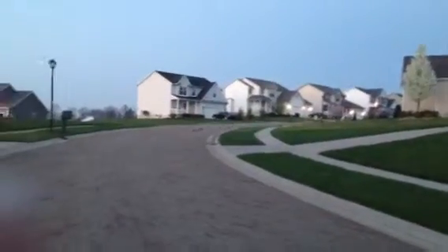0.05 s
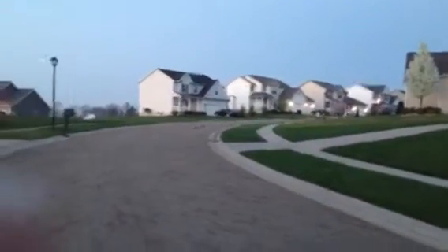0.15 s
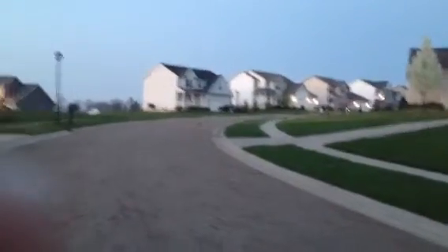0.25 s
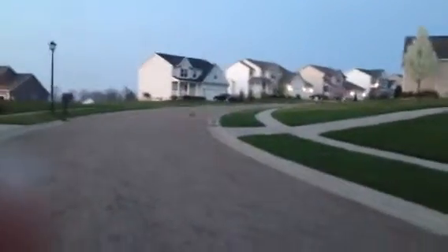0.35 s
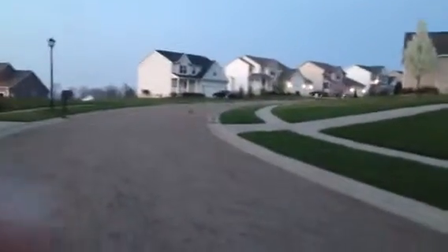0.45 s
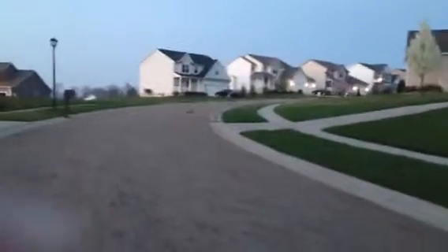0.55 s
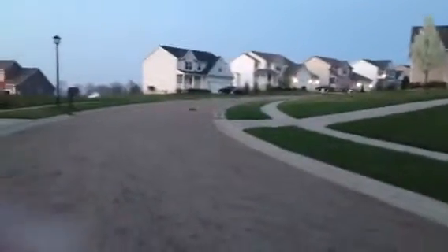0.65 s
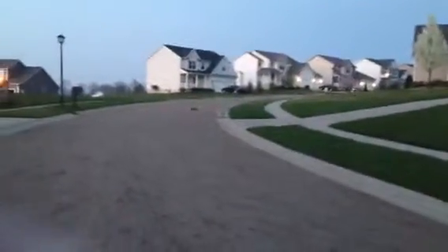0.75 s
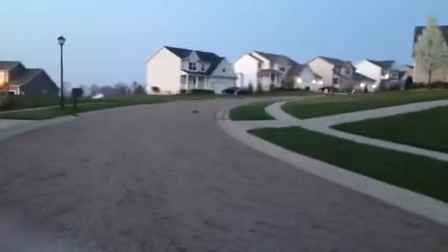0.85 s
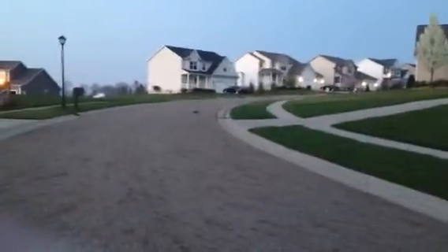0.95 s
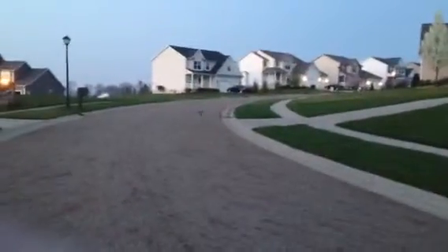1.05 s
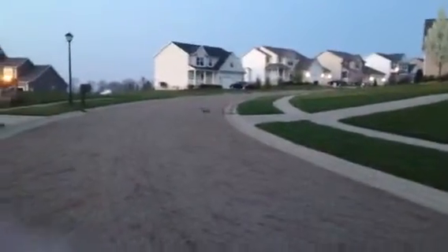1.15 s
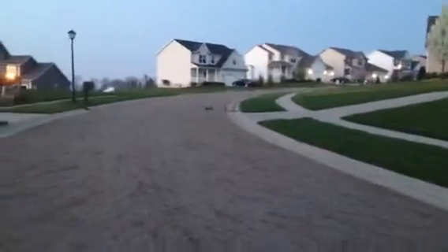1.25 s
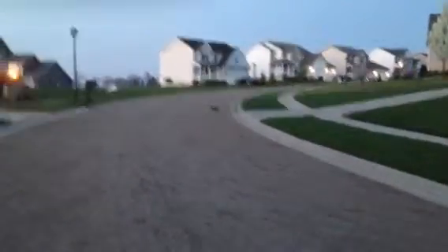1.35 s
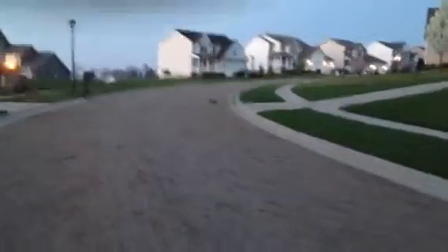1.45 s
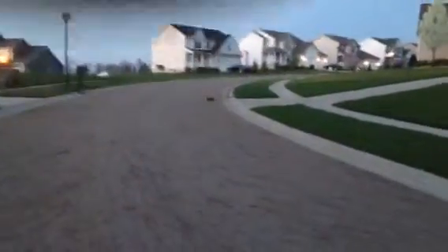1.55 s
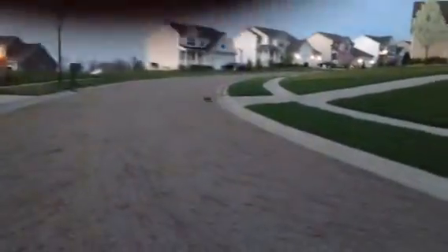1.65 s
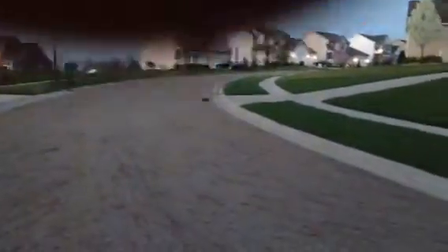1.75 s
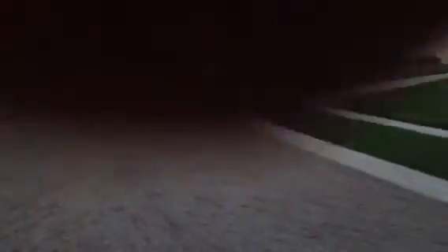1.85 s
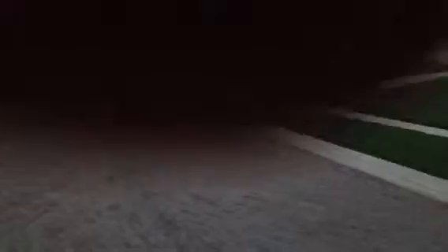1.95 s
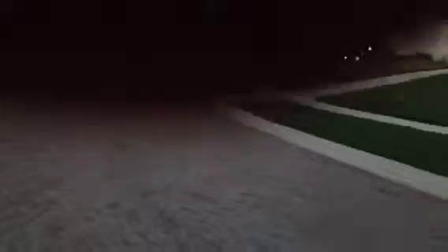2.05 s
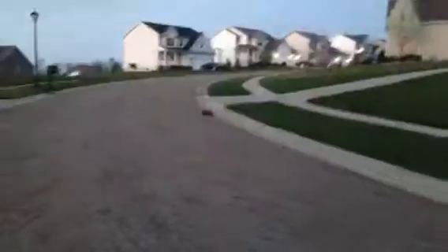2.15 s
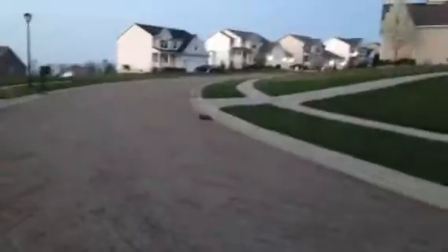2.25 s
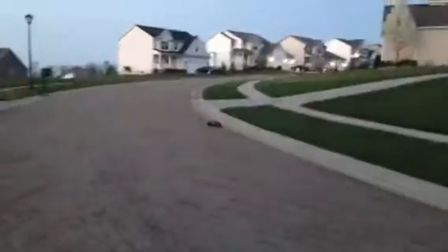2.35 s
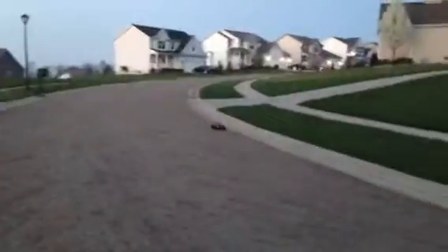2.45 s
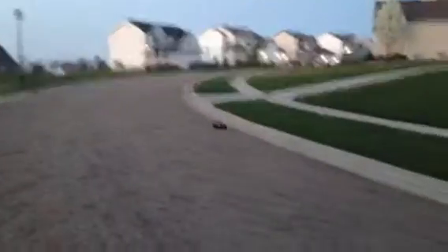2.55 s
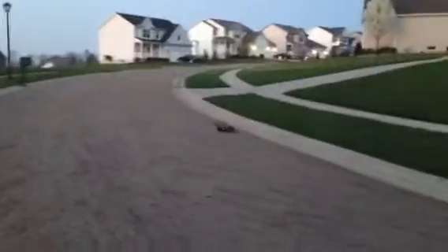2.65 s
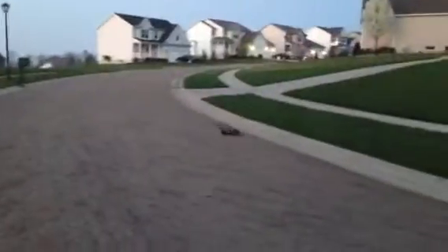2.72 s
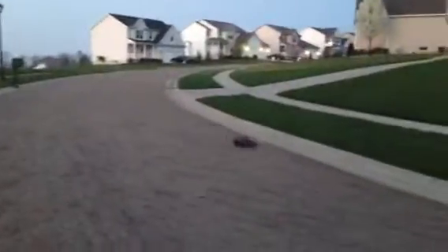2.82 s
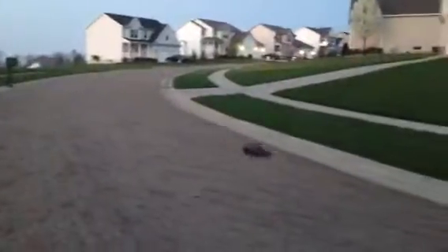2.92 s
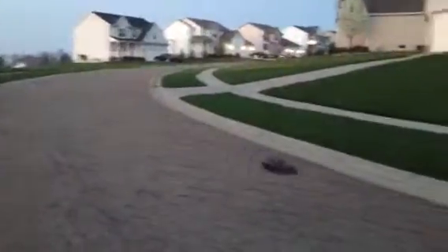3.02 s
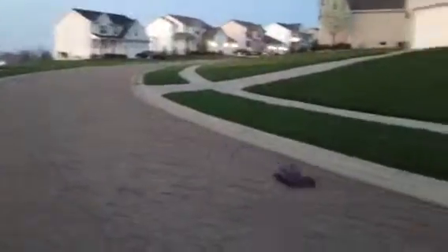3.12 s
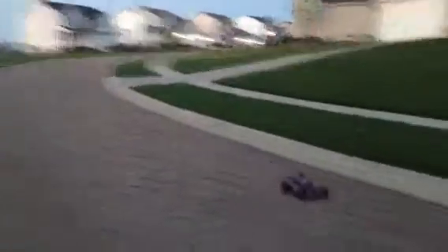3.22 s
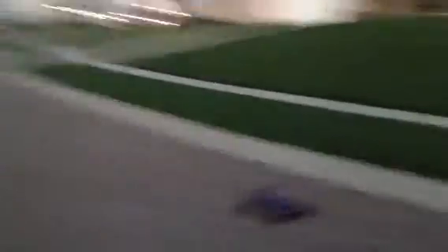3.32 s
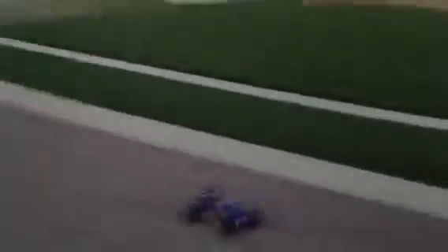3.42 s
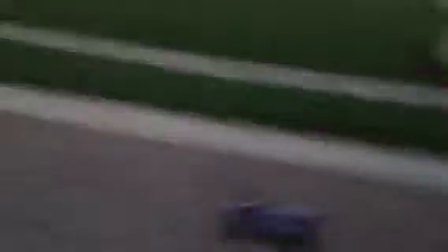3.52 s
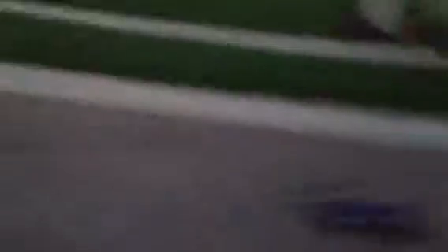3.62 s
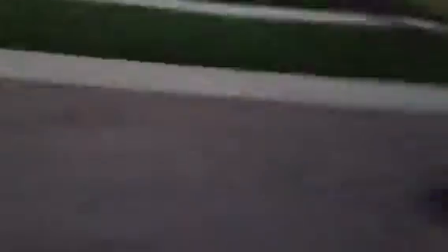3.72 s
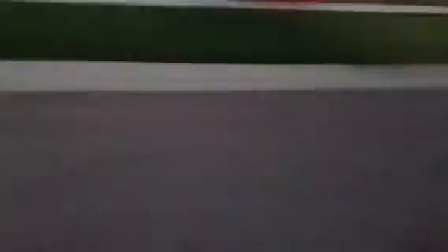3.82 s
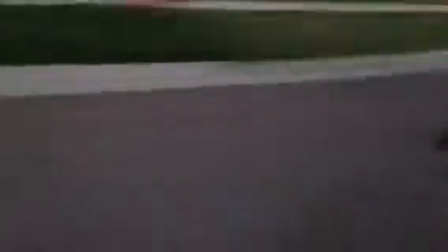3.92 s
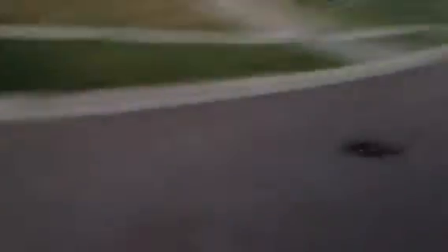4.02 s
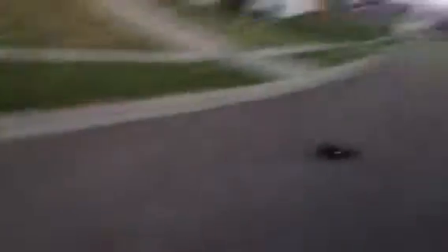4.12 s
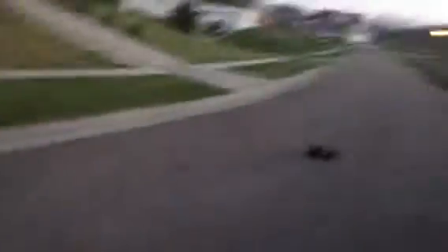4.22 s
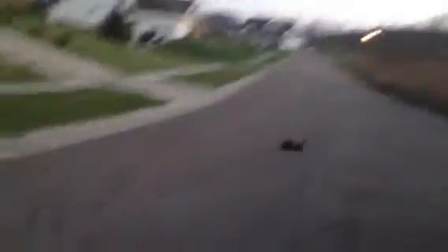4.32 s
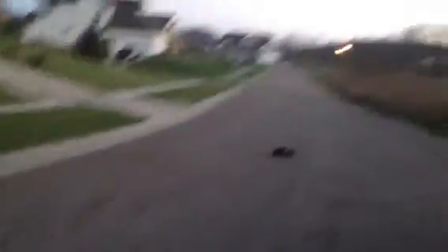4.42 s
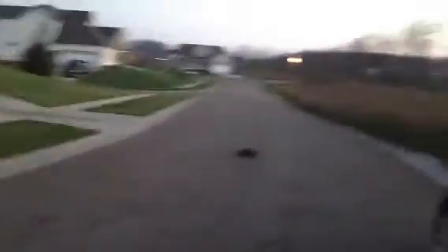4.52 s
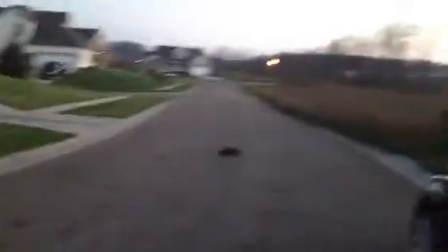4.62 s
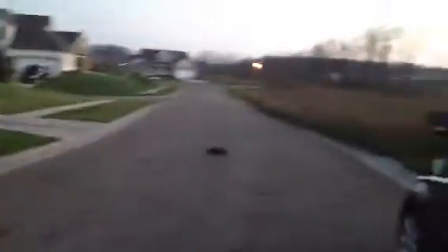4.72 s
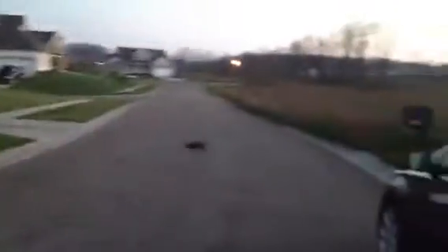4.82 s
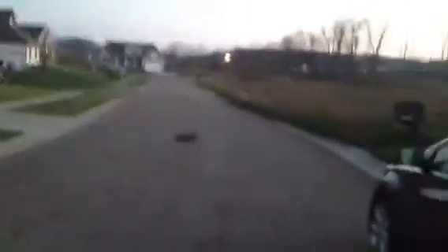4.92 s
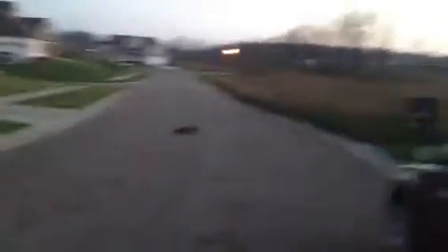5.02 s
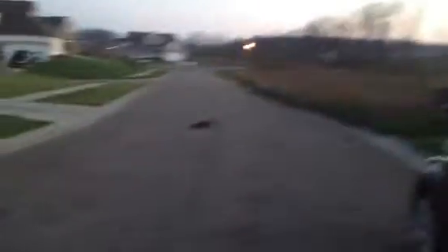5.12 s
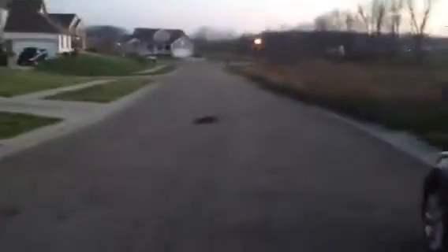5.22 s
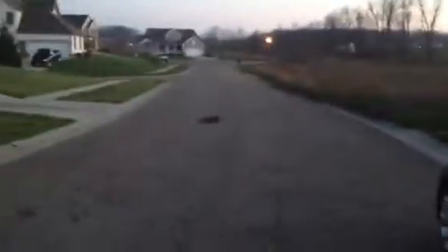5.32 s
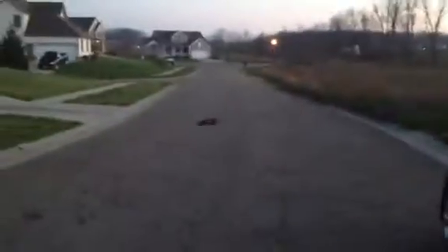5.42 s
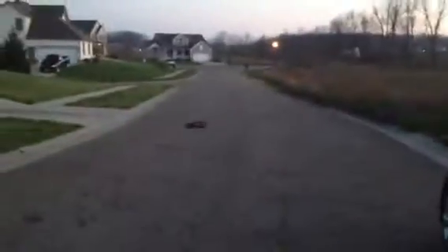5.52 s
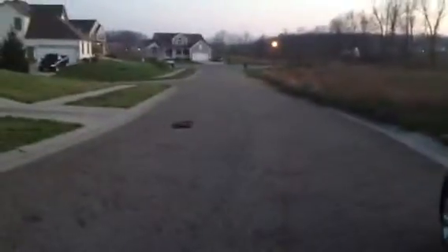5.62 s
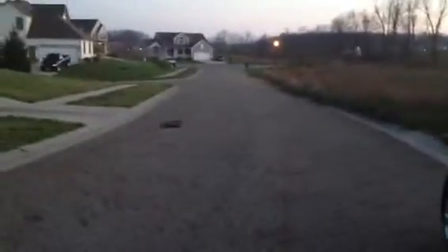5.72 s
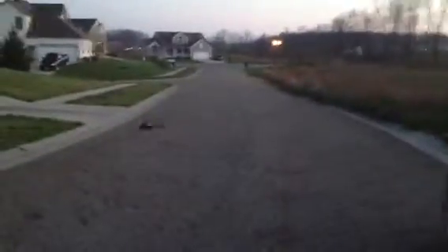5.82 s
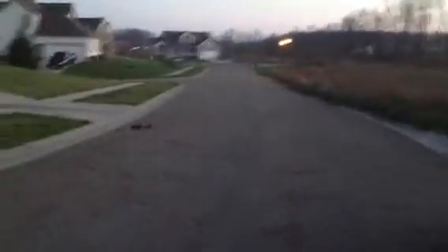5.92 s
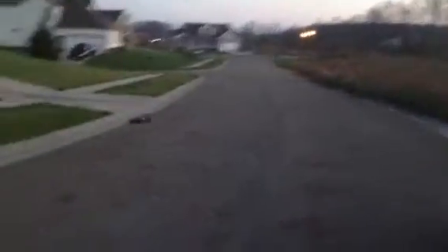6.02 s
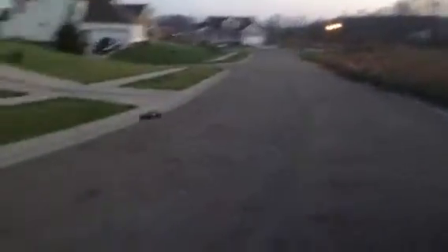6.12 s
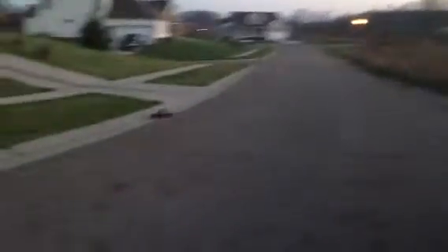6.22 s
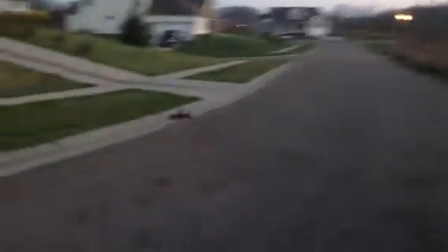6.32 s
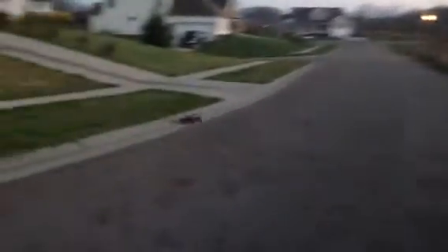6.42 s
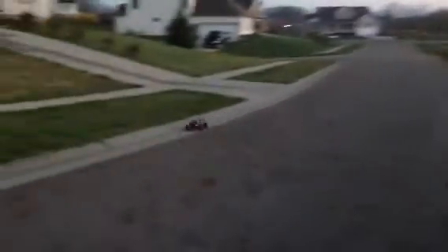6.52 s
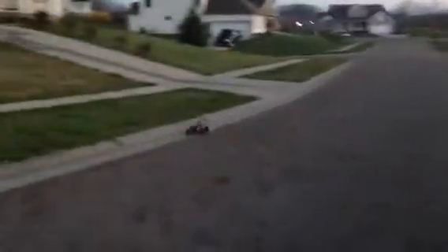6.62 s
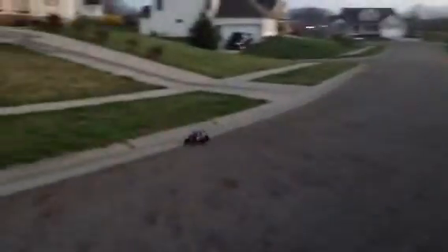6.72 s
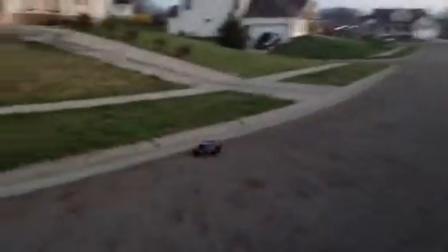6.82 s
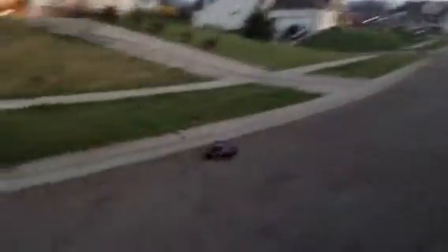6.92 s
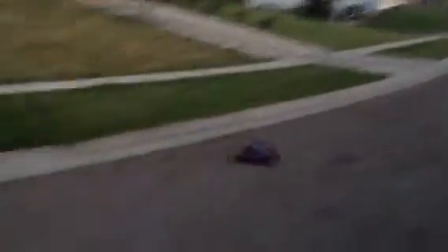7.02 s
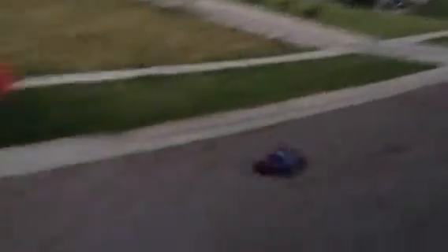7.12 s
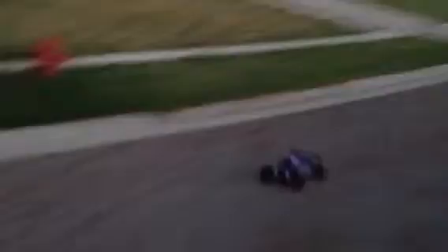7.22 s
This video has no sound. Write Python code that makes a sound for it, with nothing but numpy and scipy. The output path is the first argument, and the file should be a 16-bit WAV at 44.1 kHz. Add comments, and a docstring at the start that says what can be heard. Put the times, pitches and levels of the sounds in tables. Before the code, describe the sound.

A small electric radio-controlled truck whines past on asphalt, skids almost to a stop, then revs in bursts and speeds back.

```python
"""A small electric radio-controlled truck races up a quiet asphalt street: the road's grain drums on its
tyres, its treads hiss, its gearbox rattles with each wheel turn and its gear teeth whine. The sound and
its road reflection reach a hand-held microphone, first shaded by a finger, then briefly cupped.
The truck passes at 3.7 s, brakes into a squealing skid at 4.4 s and all but stops at 5.3 s. It turns with
chirping gears and scuffing tyres, then speeds back."""
import sys
import numpy as np
from scipy import signal
from scipy.fft import rfft, irfft
from scipy.io import wavfile
from scipy.ndimage import uniform_filter1d, map_coordinates

SR = 44100
rng = np.random.default_rng(int(sys.argv[2]) if len(sys.argv) > 2 else 0)


def dump_mix(stems):
    """Bounce the given channels to the path in sys.argv[1] as a 16-bit WAV at rate SR."""
    frames = np.atleast_2d(stems).T  # one column per channel
    limited = np.clip(frames, -1, 1)  # hard clip at full scale
    pcm = np.round(limited * 32767).astype(np.int16)
    wavfile.write(sys.argv[1], SR, pcm)


N = 320166
TIME = np.arange(N) / SR
BRAKE_S, STOP_S = 4.42, 5.27
# the truck's range from the microphone: time_s, distance_m
DISTANCE = [(0, 48), (1.25, 29.5), (2.3, 17.8), (2.6, 12.8), (3.05, 7.6), (3.35, 3.94), (3.55, 2.73),
            (3.72, 2.68), (4.1, 4.67), (4.4, 6.27), (4.7, 8.15), (5.25, 13), (6.0, 15.4), (6.4, 15.4),
            (6.75, 11.3), (7.0, 6.94), (7.26, 3.6)]


def gain_of(db):
    """Amplitude ratio of a level in decibels."""
    return 10 ** (np.asarray(db) / 20)


def unit_rms(x):
    """Normalisation to rms 1."""
    return x / np.sqrt(np.mean(abs(x) ** 2) + 1e-20)


def follow(rows):
    """Linear interpolation of each column over the times in the first."""
    times, *columns = np.transpose(rows)
    return [np.interp(TIME, times, column) for column in columns]


def until(end_s, ramp_s):
    """Envelope that is 1 until end_s, then falls linearly to 0."""
    return np.clip(1 - (TIME - end_s) / ramp_s, 0, 1)


def held(start_s, end_s, ramp_s):
    """Trapezoidal envelope: rises from start_s, falls from end_s."""
    return np.clip((TIME - start_s) / ramp_s, 0, 1) * until(end_s, ramp_s)


def swell(centre_s, half_s):
    """Gaussian envelope with peak 1."""
    return np.exp(-((TIME - centre_s) / half_s) ** 2)


def wander(rate_hz):
    """Random modulation: noise low-passed near rate_hz; rms 1."""
    f = np.arange(0, 3000, SR / N)
    real, imaginary = rng.standard_normal((2, len(f)))
    return unit_rms(irfft((real + 1j * imaginary) / (1 + (f / rate_hz) ** 4), N))


def narrowband(hz, width_hz):
    """Narrow-band noise: a carrier drifting in amplitude and phase; rms 1."""
    carrier = np.exp(2j * np.pi * np.cumsum(hz * np.ones(N)) / SR)
    return unit_rms((carrier * (wander(width_hz) + 1j * wander(width_hz))).real)


def grains(clump_db, clump_hz):
    """Countless tiny impacts sum to Gaussian noise, modulated as they clump."""
    return rng.standard_normal(N) * gain_of(clump_db * wander(clump_hz))


def coloured(x, spectrum):
    """Spectral shaping by rows of frequency_hz, level_db; rms 1."""
    hz, db = np.transpose(spectrum)
    f = np.fft.rfftfreq(N, 1 / SR) + 1
    shape_db = np.interp(np.log(f), np.log(hz), db)
    return unit_rms(irfft(rfft(x) * gain_of(shape_db), N))


def ringing(x, modes):
    """Steep-sided resonances, rows of pitch_hz, nominal_width_hz, level_db; rms 1."""
    f = np.fft.rfftfreq(N, 1 / SR) + 1
    power = sum(gain_of(db) ** 2 / (1 + ((f - hz ** 2 / f) / (1.59 * width)) ** 2) ** 2
                for hz, width, db in modes)
    return unit_rms(irfft(rfft(x) * np.sqrt(power), N))


def notched(x, dips):
    """Time-varying notches, rows of centre_hz, width_octaves, depth_db; a negative depth boosts."""
    f, t, spectra = signal.stft(x, SR, nperseg=512)
    cut_db = 0
    for hz, width, depth_db in dips:
        hz, depth_db = (np.interp(t, TIME, v * np.ones(N)) for v in (hz, depth_db))
        octaves = np.log2(f + 1)[:, None] - np.log2(hz)
        cut_db = cut_db + depth_db * np.exp(-(octaves / width) ** 2)
    return signal.istft(spectra * gain_of(-cut_db), SR, nperseg=512)[1][:N]


def doppler(x):
    """Doppler shift: the travel time of the sound changes with distance."""
    delay_s = follow(DISTANCE)[0] / 343
    return map_coordinates(x, [(TIME - delay_s) * SR], order=3, mode="wrap")


def street():
    """Ambient noise: a faint broadband wash and a distant narrow-band hum."""
    # outdoor spectrum: frequency_hz, level_db
    wash_spectrum = [(25, -16), (45, -20), (80, -12.5), (125, -1), (200, 2), (330, -8), (600, -3),
                     (1000, -20), (1600, -20), (2100, -3), (2700, -5), (3400, -6.5), (4400, -10),
                     (7000, -16), (10000, -27), (15000, -32)]
    # strength of the hum: time_s, level_db
    hum_levels = [(0, -63), (1.0, -60), (2.0, -66.5), (7.26, -87)]
    wash = gain_of(-55) * coloured(rng.standard_normal(N), wash_spectrum)
    return wash + gain_of(follow(hum_levels)[0]) * narrowband(162, width_hz=4.7)


def drive():
    """Motor speed sets the gears' meshing rate, and the throttle their load."""
    # flat out, braked, then wound up in steps: time_s, tooth_hz
    motor_speed = [(0, 5960), (2.151, 6200), (2.4, 6010), (2.9, 5816), (3.55, 5340), (4.25, 4550),
                   (4.42, 4067), (4.47, 3130), (4.487, 2790), (4.53, 2150), (4.701, 1303), (5.25, 900),
                   (5.34, 1030), (5.40, 1080), (5.46, 1320), (5.497, 1660), (5.522, 1570), (5.537, 2310),
                   (5.597, 2230), (5.615, 2800), (5.645, 2950), (5.68, 2790), (5.70, 3200), (5.735, 3130),
                   (5.76, 3300), (5.785, 3280), (5.81, 3470), (5.9, 3560), (5.96, 3500), (6.01, 3270),
                   (6.15, 3270), (6.23, 3850), (6.27, 3900), (6.32, 3600), (6.37, 3850), (6.43, 4280),
                   (6.485, 4080), (6.52, 4600), (6.62, 4560), (6.85, 4900), (7.1, 5150), (7.26, 5330)]
    # steady load on the gears: time_s, load_share
    steady_load = [(0, 0.56), (1.3, 0.43), (2.4, 0.58), (3.199, 0.45), (3.62, 0.43), (3.8, 0.33),
                   (4.251, 0.58), (4.33, 0.2), (4.47, 0.68), (5.27, 0), (5.33, 0.3), (5.45, 0.36),
                   (5.701, 0.82), (6.05, 0.92), (6.3, 0.94), (6.7, 0.79), (7.26, 0.55)]
    # blips of the throttle: time_s, half_length_s, added_load_share
    surges = [(5.497, 0.031, 0.2), (5.574, 0.065, 0.26), (5.722, 0.034, 0.12), (5.863, 0.12, 0.11),
              (6.187, 0.018, 0.12), (6.446, 0.12, 0.19)]
    blips = sum(extra * swell(s, half_s) for s, half_s, extra in surges)
    return follow(motor_speed)[0], follow(steady_load)[0] + blips


def layer_level(tooth_hz, load, slide, cruise_db, decade_db, load_db, slide_db, cruise_hz=5500):
    """Incoherent sources add in power: rolling, a power law of speed, plus sliding; relative dB."""
    rolling = gain_of(cruise_db + decade_db * np.log10(tooth_hz / cruise_hz) + load_db * load)
    return 20 * np.log10(np.hypot(rolling, gain_of(slide_db) * slide))


def tyre_roar(level_db, knock, metres, side_on):
    """Forced vibration: asphalt grain drums on the hollow tyres and the body shell."""
    # tyre and shell resonances: pitch_hz, nominal_width_hz, level_db
    tyre_modes = [(244, 97, -9), (364, 110, -5.5), (687, 288, 2.5), (860, 140, 0.5), (1434, 450, 1.5),
                  (2008, 164, 3), (2416, 195, -3.5)]
    drumming = ringing(grains(clump_db=0.97, clump_hz=87), tyre_modes)
    roar = gain_of(level_db + 2) * doppler(drumming) * knock ** 0.074
    hollow = (586, 0.35, 10 * swell(3.88, 0.33))  # the roar turns hollow in passing
    boom = (286, 0.6, -7 * np.exp(-(metres / 5.1) ** 2))  # close by, the tyres boom
    shell = (1020, 0.15, -7.5 * side_on)  # side-on, the shell rings
    return notched(roar, [hollow, boom, shell])


def tread_hiss(level_db, tilt_db_per_octave):
    """Directivity: tread blocks leave the road with a hiss whose treble tilts as the truck turns."""
    # spectrum of the hiss: frequency_hz, level_db
    hiss_spectrum = [(2000, -32), (4900, -13.5), (6000, 4.5), (7700, 3.5), (9500, -0.5), (11500, 5),
                     (12600, 2), (13800, 0), (14600, -7), (15300, -21)]
    hiss = coloured(grains(clump_db=1.53, clump_hz=145), hiss_spectrum)
    f, t, spectra = signal.stft(hiss, SR, nperseg=256)
    octaves = np.log2(np.maximum(f, 5000) / 10000)[:, None]
    spectra = spectra * gain_of(octaves * np.interp(t, TIME, tilt_db_per_octave))
    return gain_of(level_db + 2.5) * signal.istft(spectra, SR, nperseg=256)[1][:N]


def gearbox(level_db):
    """Impact excitation: loose teeth rattle the modes of the plastic housing."""
    # housing resonances: pitch_hz, nominal_width_hz, level_db
    housing_modes = [(2210, 420, -6.5), (3726, 400, -2), (4220, 960, -2.5), (4490, 520, 2), (5750, 970, -4),
                     (7098, 1300, -31)]
    rattle = ringing(grains(clump_db=1.25, clump_hz=43), housing_modes)
    return gain_of(level_db - 1.64) * doppler(rattle)


def wheel_knock(depth=0.92, uneven=0.31):
    """Amplitude modulation: at full speed the drive shafts bind twice a turn, once hard, once softly."""
    # wheel speed on the flat-out run: time_s, rotation_hz
    wheel_speed = [(0.0, 36.4), (0.25, 34.9), (1.7, 36.5), (3.3, 36.5), (4.05, 34.0), (4.3, 34.0)]
    swing = np.cos(2 * np.pi * np.cumsum(follow(wheel_speed)[0]) / SR + 0.12 * wander(10))
    hard, soft = 1.15 * np.exp(5 * (swing - 1)), 0.4 * np.exp(-5 * (swing + 1))
    load = 1 + depth * until(BRAKE_S, 0.035) * (hard + soft) * (1 + uneven * wander(7.2))
    return load / np.sqrt(uniform_filter1d(load ** 2, 4000))  # keeps the mean power level


def whine(tooth_hz, load, flutter=0.013, whirr_width_hz=260, load_db=12.5, fade_span_hz=600):
    """Gear-mesh partials, loud where the housing resonates; bumps smear their whistle into a whirr."""
    # coarse on the bumpy run, purer at a crawl: time_s, whirr_share, level_db
    whine_tone = [(0, .85, 1), (4.3, 0.95, -1.5), (4.42, .85, -10), (4.455, .5, -5), (4.48, .4, 3),
                  (4.56, 0.55, 0), (5.3, .4, -9), (5.38, .15, -4), (5.43, .45, -8), (5.49, .15, 0),
                  (5.525, .3, -3), (5.55, .25, 1), (5.62, .5, -1.5), (5.76, .5, -1), (5.93, .5, -3),
                  (6.02, 0.5, -5), (6.25, .55, -6), (6.45, 0.35, -.5), (6.8, .5, 2), (7.26, .7, 2)]
    # how well the housing radiates: frequency_hz, level_db
    housing_response = [(600, -35), (1100, -34), (1600, -32.5), (2100, -32.5), (2350, -33.5), (2620, -36),
                        (2900, -42.5), (3250, -40), (3600, -38.5), (4300, -32), (5200, -29), (6000, -30.5),
                        (6900, -25), (8400, -32.5), (9000, -40), (10000, -63), (10900, -23), (12300, -44.5)]
    # mesh partials: tooth_rate_multiple, level_db, lowest_tooth_hz, highest_tooth_hz, whirr_factor
    mesh_partials = [(.5, -5, 3900, 9000, 0.66), (1, -1, 0, 9000, 1.25), (2, 0.5, 0, 9000, 1.3),
                     (3, -7, 600, 2400, 1)]
    smear, level_db = follow(whine_tone)
    hz = tooth_hz * (1 + flutter * wander(70))  # the motor speed trembles
    phase = 2 * np.pi * np.cumsum(hz) / SR
    housing_hz, housing_db = np.transpose(housing_response)
    out = np.zeros(N)
    for k, db, from_hz, to_hz, factor in mesh_partials:
        whistle_gain, whirr_gain = np.sqrt(np.clip([1 - factor * smear, factor * smear], 0, 1))
        radiated_db = np.interp(np.log(k * tooth_hz), np.log(housing_hz), housing_db)
        in_range = np.clip(np.minimum(tooth_hz - from_hz, to_hz - tooth_hz) / fade_span_hz, 0, 1)
        whistle = whistle_gain * np.sqrt(2) * np.sin(k * phase)
        whirr = whirr_gain * narrowband(k * hz, k * whirr_width_hz)
        out += gain_of(db + radiated_db) * in_range * (whistle + whirr)
    return out * gain_of(level_db + load * (load_db + 3 * wander(50)))


def road_path(x, metres, dulling_db_per_m=0.51):
    """Interference with the road's reflection and the truck's directivity colour the treble."""
    # main cancelled band, higher when the truck is farther: time_s, centre_hz, nominal_depth_db
    road_dip = [(0, 15000, 10), (2.1, 13600, 2), (2.38, 11500, 9), (2.6, 10050, 7), (3.28, 9400, 1),
                (3.4, 6560, 5), (3.65, 6250, 9.5), (4.25, 6130, 7.5), (4.45, 6800, 3), (4.65, 7500, 0),
                (4.95, 10600, 8), (5.4, 10700, 12), (5.95, 12500, 2.5), (6.4, 11400, 8.5), (6.95, 10100, 1),
                (7.26, 9000, 4)]
    # the reflection's comb of dips: centre_multiple, width_octaves, depth_factor
    comb_dips = [(.333, .06, .3), (1, 0.16, 1.18), (1.95, 0.078, 0.98)]
    # tread rasp carries sideways and is faint head-on: time_s, boost_db
    rasp_boost = [(0, 1), (2.25, 1), (2.5, -6.5), (3.3, -11), (3.65, 4), (4.25, -2), (4.4, -5.5),
                  (4.7, 0.5), (5.2, -7), (5.6, -7.5), (6.1, 5), (6.5, -1), (6.9, -4), (7.26, -6)]
    hz, depth_db = follow(road_dip)
    comb = [(multiple * hz, width, factor * depth_db) for multiple, width, factor in comb_dips]
    # the highest treble is duller when the truck is far
    top_dulling = (14730, 0.45, dulling_db_per_m * metres)
    rasp = (7870, 0.32, -follow(rasp_boost)[0])
    return notched(x, comb + [top_dulling, rasp])


def hand_filter(x, finger, cup):
    """Cavity resonance: a finger, then a cupped hand, colour all that reaches the microphone."""
    # the hollow under the finger: centre_hz, width_octaves, depth_db (negative rings)
    finger_dips = [(2230, 0.2, -4), (2910, 0.11, -8), (4135, 0.15, 14.5), (8660, 0.23, 6.5)]
    sink = 1 - 0.12 * (1 - finger)  # the dips slide down as the finger lifts
    dips = [(hz * sink, width, db * finger) for hz, width, db in finger_dips]
    cup_ring = (3120, 0.15, -8 * cup)
    narrow_notch = (4970, 0.04, 5 + 18 * (finger + cup))  # a narrow notch near 5 kHz, deepest in the first 2.2 s
    return notched(x, dips + [cup_ring, narrow_notch])


def sliding(attack_s=0.054, fade_s=0.27):
    """Envelope of sliding friction: a quick bite, a hold, a fade that steepens."""
    # slides under the brake and in the last bend: start_s, fade_start_s, level_db
    slides = [(4.41, 4.831, 0), (7.15, 7.3, -7.5)]
    out = np.zeros(N)
    for start_s, fade_start_s, db in slides:
        bite = np.clip((TIME - start_s) / attack_s, 0, 1)
        out += gain_of(db) * bite * np.where(TIME < fade_start_s, 1, swell(fade_start_s, fade_s))
    return out


def skid(slide):
    """Friction noise: sliding rubber groans in a few resonant bands."""
    groan_modes = [(563, 134, -1), (750, 160, 5.5), (1326, 310, -1.5), (2280, 290, -7.5)]
    return gain_of(-19) * slide * ringing(grains(clump_db=1.6, clump_hz=52), groan_modes)


def skid_wobble(rock_hz=11.6, pinch=0.14, uneven=0.2):
    """Amplitude modulation: the braked truck rocks on its tyres, hardest just before it stops."""
    phase = 2 * np.pi * rock_hz * (TIME - 4.954)
    rock = np.cos(phase) - pinch * np.cos(2 * phase) - 0.33
    depth = (3.1 + 4 * swell(5.05, 0.2)) * (1 + uneven * wander(12))
    return gain_of(depth * held(BRAKE_S, STOP_S, 0.12) * rock)


def chirps(fall=0.06, spread=0.049):
    """Transients: gear teeth chatter as the load jumps, each a falling tone with a narrow-band scrape."""
    # chatters: centre_s, relative_level_db, pitch_hz, half_length_s
    chatters = [(4.425, -21, 4600, 0.003), (5.323, -46, 5800, 0.0053), (5.535, -37, 2150, 0.0063),
                (5.538, -27, 4630, 0.0045), (5.556, -33, 4570, 0.0051), (5.593, -36, 4500, 0.007),
                (5.594, -34, 2210, 0.0094), (5.640, -27, 6450, 0.0049), (5.696, -30, 6300, .005),
                (5.704, -32.5, 3220, 0.0064), (5.711, -33, 6900, 0.0034), (5.722, -35, 3130, 0.0074),
                (5.727, -32, 6800, .003), (5.752, -32, 7100, .003), (5.76, -35, 3250, 0.0067),
                (5.77, -32, 6580, 0.0037), (5.805, -26, 6940, 0.0044), (5.821, -24, 6900, .0045),
                (5.837, -25, 6750, .003), (5.852, -26.5, 7000, .004), (5.883, -24.5, 6900, .0045),
                (5.899, -24, 6750, .0028), (5.910, -32, 7250, .003), (5.922, -26, 6950, .0035),
                (5.936, -25, 7100, .004), (5.964, -27, 6850, .004), (5.977, -27.5, 4380, 0.0046),
                (6.005, -34, 4290, 0.0037), (6.203, -30, 6970, .004), (6.273, -31.5, 4130, 0.007),
                (6.294, -31, 4160, .0054), (6.313, -30, 6460, .004), (6.33, -30, 7080, .003),
                (6.359, -26.5, 4320, 0.0029), (6.42, -33, 4450, 0.0065), (6.42, -38, 8400, .0065),
                (6.465, -39, 4160, 0.0078), (6.516, -34, 4550, .009)]
    out, t = np.zeros(N), np.arange(-1500, 1500) / SR
    for s, db, hz, half_s in chatters:
        span = round(s * SR) + np.arange(len(t)) - len(t) // 2
        falling_hz = hz * (1 - fall * np.tanh(t / half_s / 2))
        tone = np.sin(2 * np.pi * (np.cumsum(falling_hz) / SR + rng.random()))
        band = signal.butter(2, [hz * (1 - spread), hz * (1 + spread)], "band", fs=SR, output="sos")
        scrape = unit_rms(signal.sosfilt(band, rng.standard_normal(len(t))))
        out[span] += gain_of(db - 3.5) * np.exp(-(t / half_s) ** 2) * (0.93 * tone + 0.48 * scrape)
    return out * gain_of(wander(220))


def squeals(glide_per_s=2.19, octave_db=-14, jitter=0.09, ragged_db=3, unsteady_hz=170):
    """Stick-slip oscillation: rubber sounds a rough tone that rises as the tyre takes the weight."""
    # squeals in the skid and out of the turn: centre_s, level_db, pitch_hz, half_length_s
    slips = [(4.512, -31.5, 661, .02), (4.603, -30.5, 693, .02), (4.654, -41, 644, .015),
             (4.719, -35.5, 763, 0.019), (4.798, -34, 761, 0.017), (4.875, -33.5, 730, 0.031),
             (4.966, -38, 660, .025), (5.055, -45, 700, .02), (5.566, -46, 615, .025),
             (5.74, -48, 810, 0.024), (5.918, -43, 736, .016), (6.06, -43.5, 800, 0.024),
             (6.178, -46, 818, 0.011), (6.228, -43, 735, 0.017), (6.28, -36.5, 778, 0.0096),
             (6.362, -41, 834, .015)]
    out, unsteady = np.zeros(N), 1 + jitter * wander(unsteady_hz)
    for s, db, hz, half_s in slips:
        near = abs(TIME - s) < 3 * half_s
        t = TIME[near] - s
        rising_hz = hz * (1 + glide_per_s * t) * unsteady[near]
        phase = 2 * np.pi * (np.cumsum(rising_hz) / SR + rng.random())
        tone = np.sin(phase) + gain_of(octave_db) * np.sin(2 * phase)
        out[near] += gain_of(db) * np.exp(-(t / half_s) ** 2) * tone
    return out * gain_of(ragged_db * wander(unsteady_hz))


def creep(start_s=5.05, end_s=5.28, rise_hz_per_s=1200):
    """Narrow-band motor noise: a thin rising tone while the truck is almost still."""
    hz = 2950 + rise_hz_per_s * (TIME - start_s)
    return gain_of(-60) * held(start_s, end_s, 0.043) * narrowband(hz, width_hz=70)


def ticks(half_s=0.0021, fizz_db=-68):
    """Broadband transients: dry, bright clicks over a faint fizz as the truck stops."""
    # clicks: centre_s, level_db
    tick_peaks = [(5.175, -58), (5.223, -50), (5.256, -60), (5.290, -54), (5.303, -58), (5.318, -61),
                  (5.334, -70)]
    clicks = sum(gain_of(db) * swell(s, half_s) for s, db in tick_peaks)
    fizz = gain_of(fizz_db) * swell(STOP_S, 0.13)
    spectrum = [(2000, -19), (6000, -4), (10500, -8), (13500, 5), (15000, -6)]
    return (clicks + fizz) * coloured(rng.standard_normal(N), spectrum)


def scuffs():
    """Frictional excitation: brief slips of the tyres shake the modes of the body shell."""
    # the tyres fight for grip: centre_s, level_db, half_length_s
    slips = [(5.906, -48, 0.011), (5.998, -44, 0.37), (6.178, -43, 0.0097), (6.357, -47, 0.016)]
    envelope = sum(gain_of(db) * swell(s, half_s) for s, db, half_s in slips)
    shell_modes = [(335, 67, -2), (793, 235, 1), (1370, 410, -4.5), (2100, 390, 2)]
    return envelope * ringing(grains(clump_db=2.4, clump_hz=125), shell_modes)


def scene():
    """Superposition of all sources, the running truck with spherical spreading; both channels alike."""
    metres, slide = follow(DISTANCE)[0], sliding()
    tooth_hz, load = drive()
    side_on, turning = swell(3.86, 0.4), swell(5.57, 0.35)
    finger = until(1.305, 0.43)
    cup = (1 - until(1.765, 0.18)) * until(2.225, 0.047)
    motion = (tooth_hz, load, slide)
    tyre_db = layer_level(*motion, cruise_db=-25, decade_db=13, load_db=-1.5, slide_db=-26)
    gear_db = layer_level(*motion, cruise_db=-24.5, decade_db=17, load_db=13, slide_db=-16)
    hiss_db = layer_level(*motion, cruise_db=-28.5, decade_db=25, load_db=14.5, slide_db=-27)
    hiss_tilt = 4 - 7 * side_on - 14.5 * turning - 3.5 * finger
    knock, wobble = wheel_knock(), skid_wobble()
    # the knock loads the teeth most; side-on, the truck hides their whine
    teeth = knock ** 1.4 * whine(tooth_hz, load) * gain_of(-30 * side_on)
    treble = knock ** 0.85 * gearbox(gear_db) + knock ** 0.75 * tread_hiss(hiss_db, hiss_tilt)
    treble *= gain_of(-0.5 * finger + 3 * cup)  # the finger shades it, the cupped hand gathers it
    roar = tyre_roar(tyre_db, knock, metres, side_on)
    rolling = road_path(treble + roar, metres) + teeth
    truck = (wobble * rolling + wobble ** 0.2 * skid(slide)) / metres
    truck *= gain_of(-9 * swell(STOP_S, 0.042))  # a hush at the standstill
    mix = truck + chirps() + squeals() + scuffs() + ticks() + creep() + street()
    mono = hand_filter(mix, finger, cup)
    return np.array([mono, mono])


def record(dry, bass_cut_hz=75, edge_hz=15450):
    """Band limiting: the microphone's bass cut, then a steep low-pass."""
    bass_cut = signal.butter(2, bass_cut_hz, "high", fs=SR, output="sos")
    low_pass = signal.firwin(511, edge_hz, window=("kaiser", 9), fs=SR)
    return signal.oaconvolve(signal.sosfilt(bass_cut, dry), low_pass[None], "same")


dry = scene()
out = record(dry)
dump_mix(out)
```